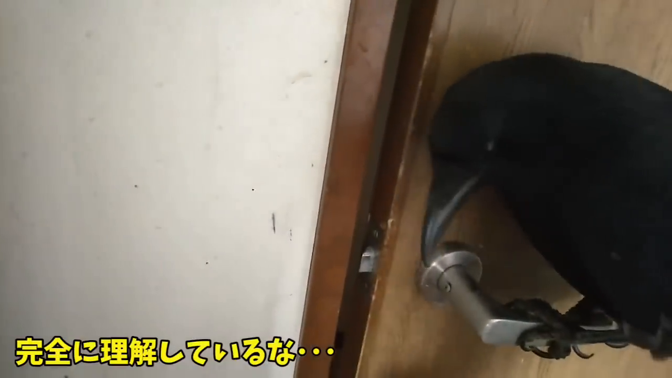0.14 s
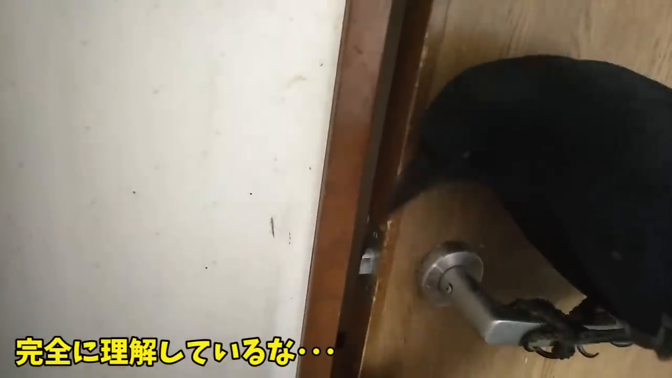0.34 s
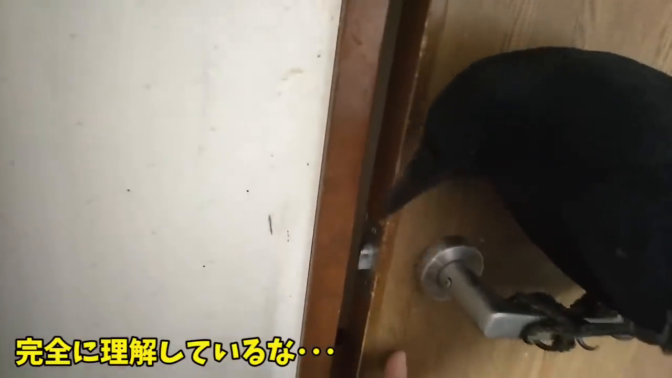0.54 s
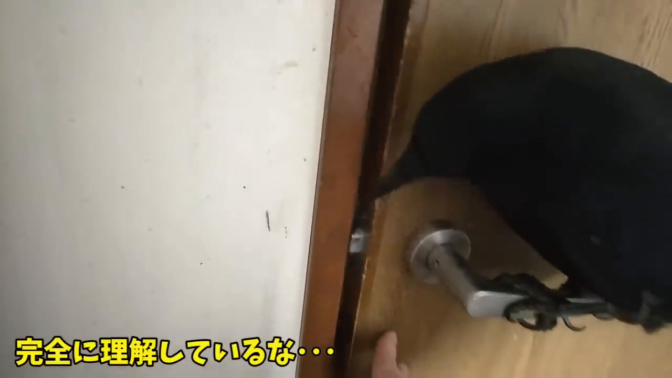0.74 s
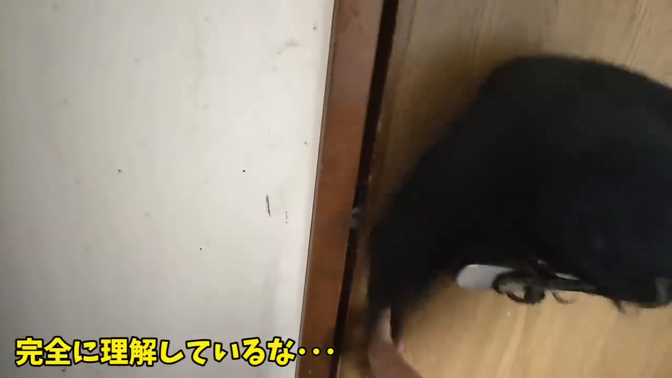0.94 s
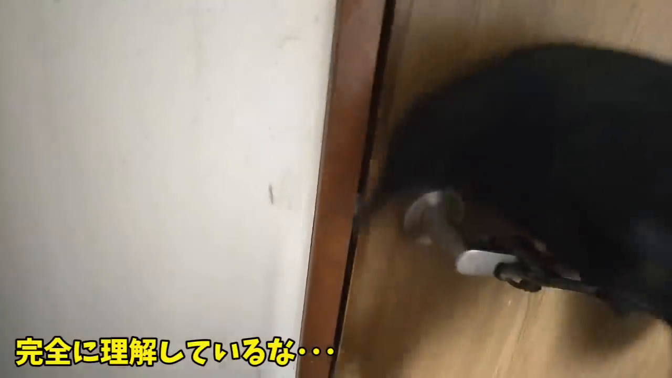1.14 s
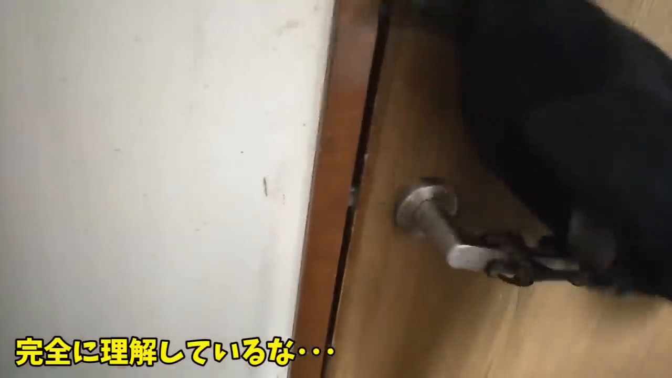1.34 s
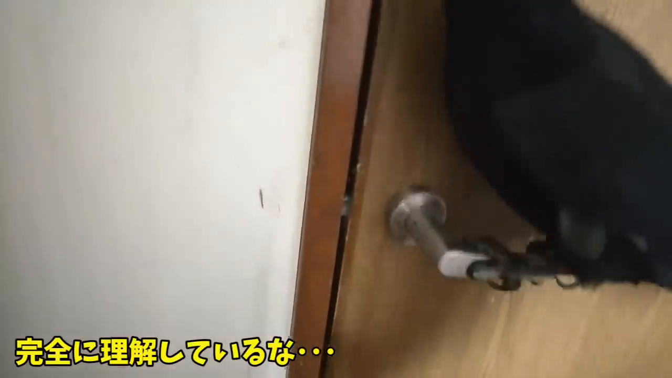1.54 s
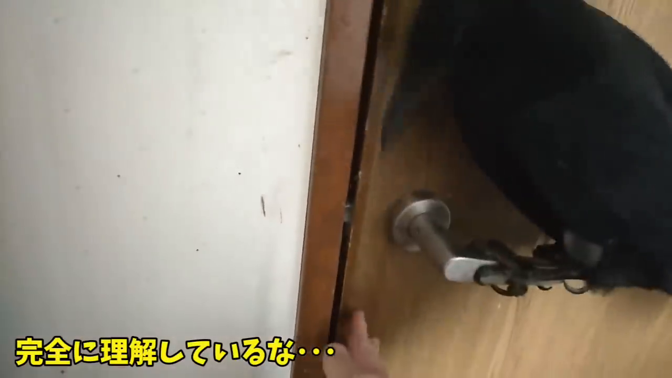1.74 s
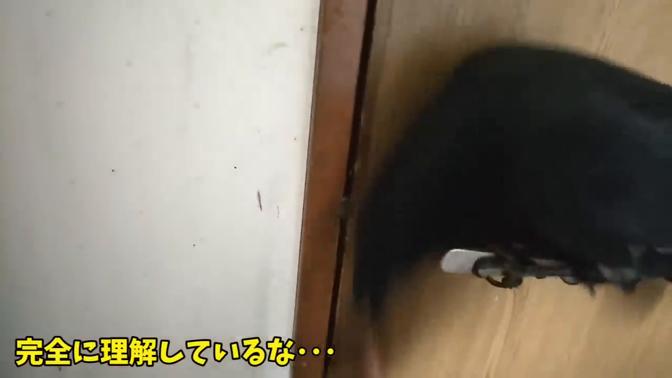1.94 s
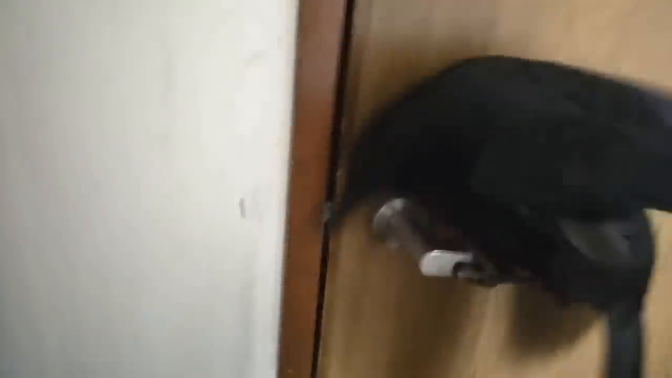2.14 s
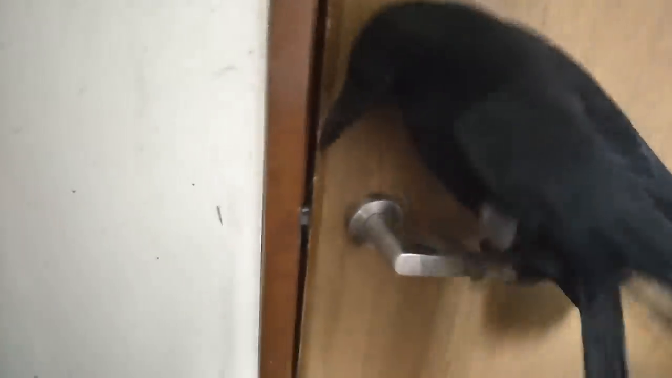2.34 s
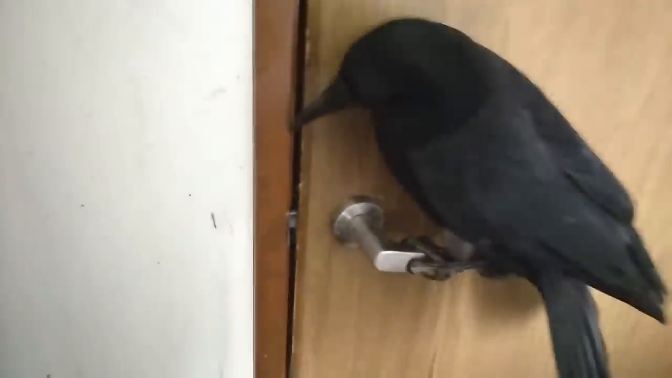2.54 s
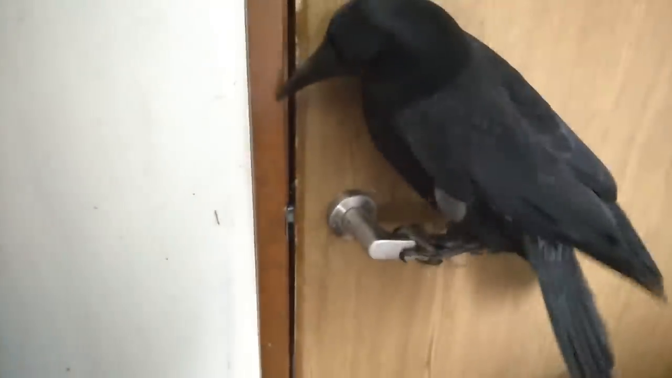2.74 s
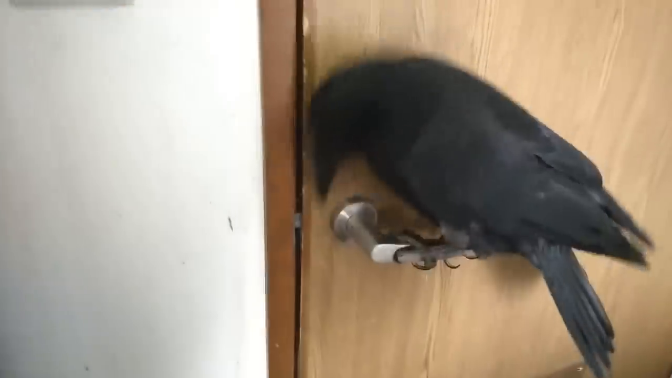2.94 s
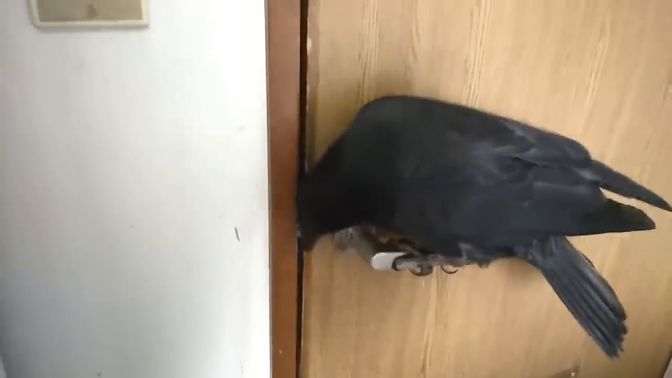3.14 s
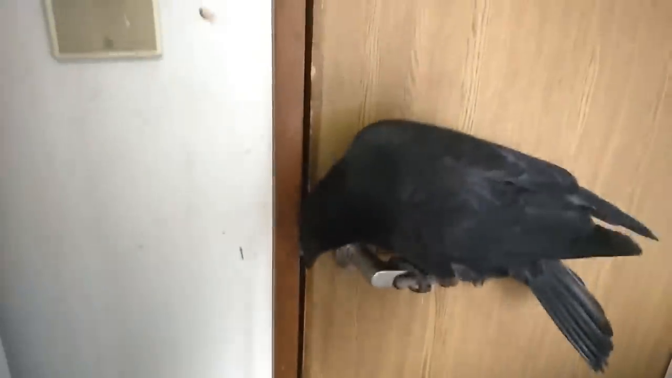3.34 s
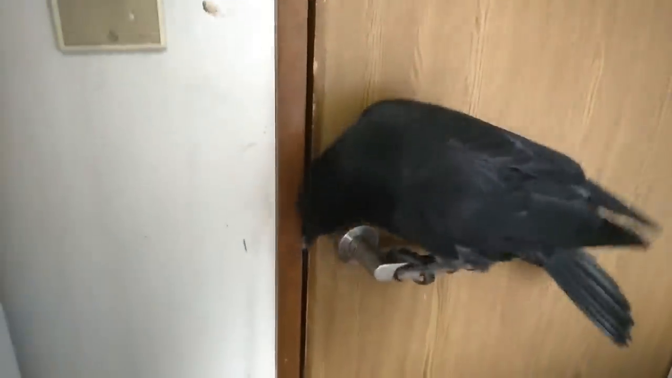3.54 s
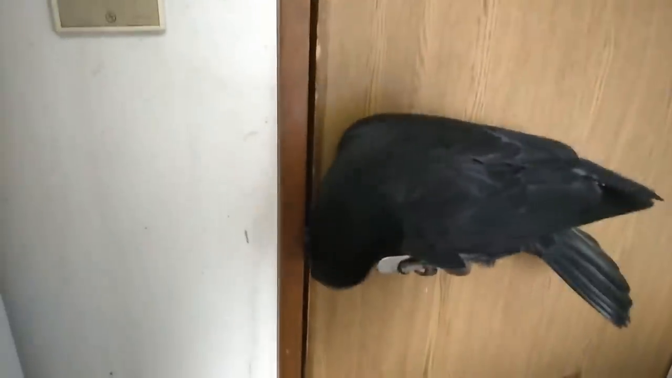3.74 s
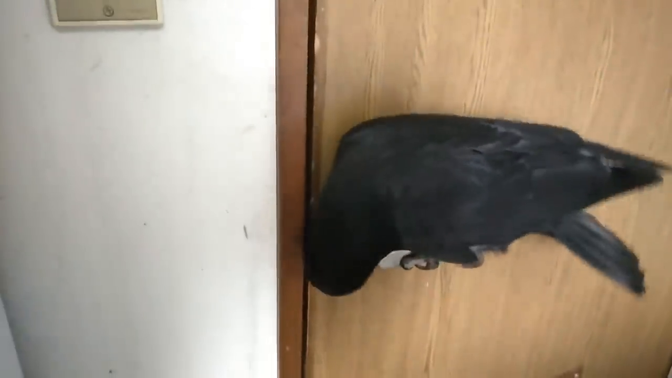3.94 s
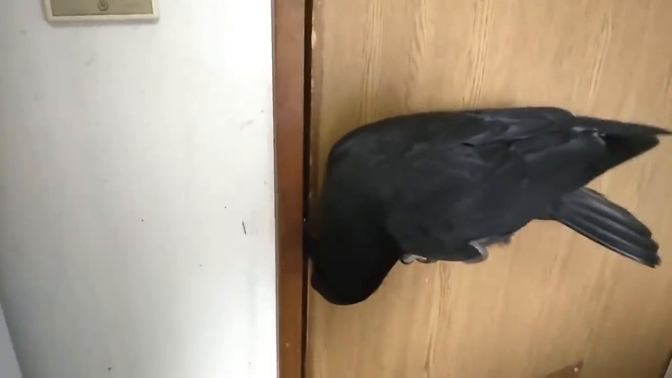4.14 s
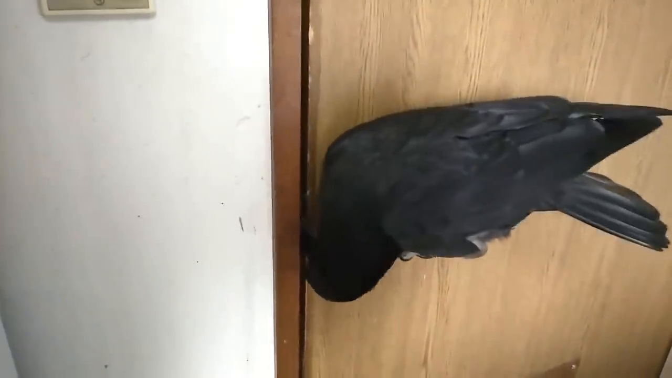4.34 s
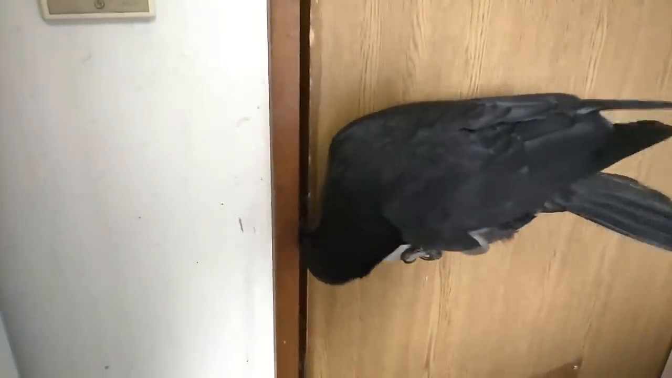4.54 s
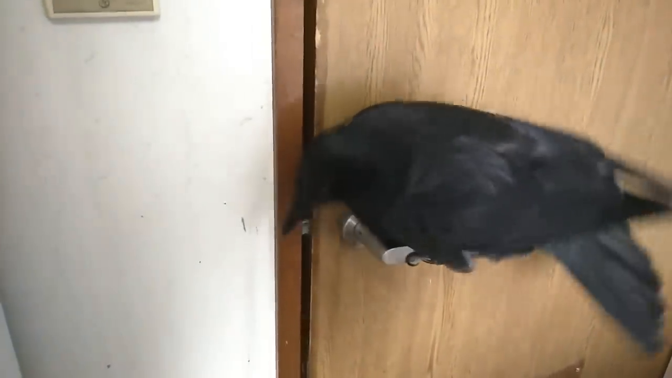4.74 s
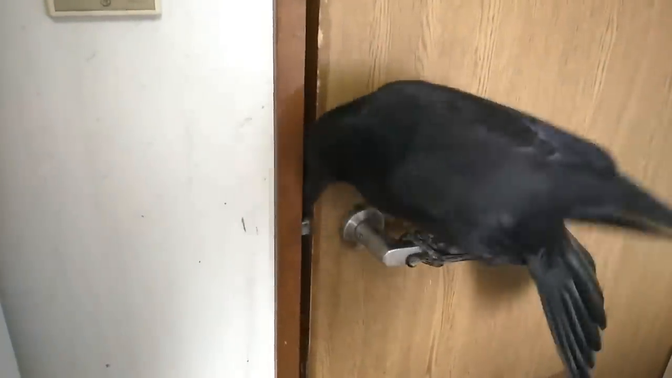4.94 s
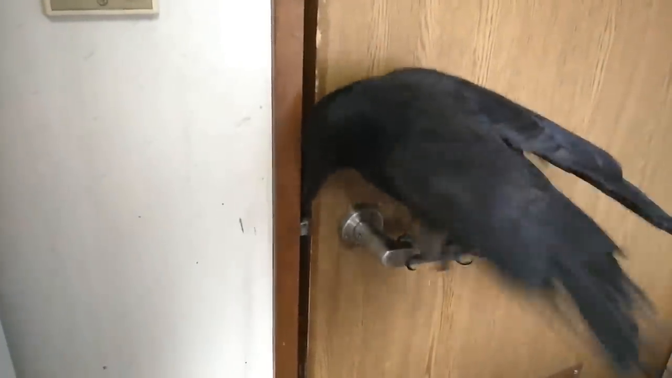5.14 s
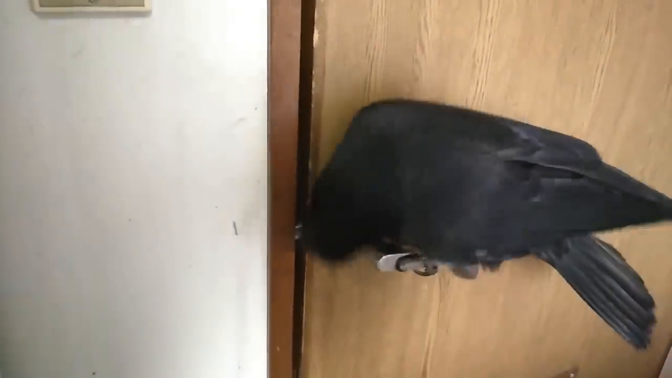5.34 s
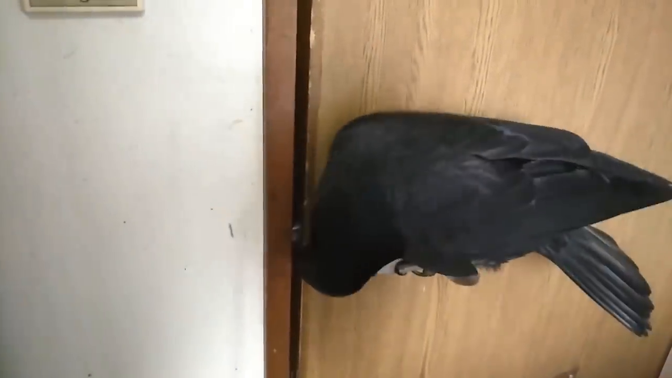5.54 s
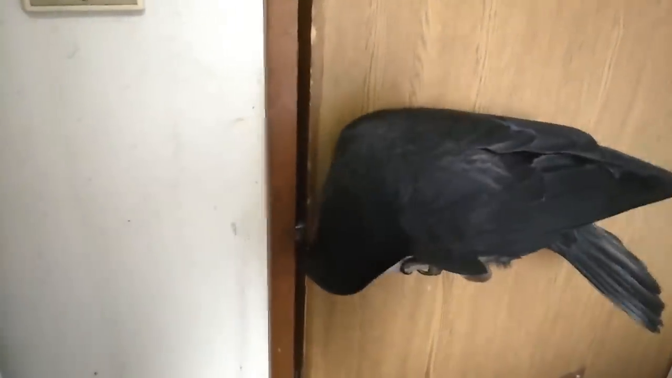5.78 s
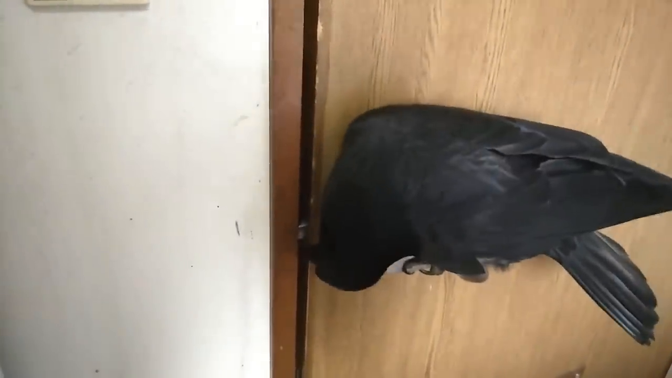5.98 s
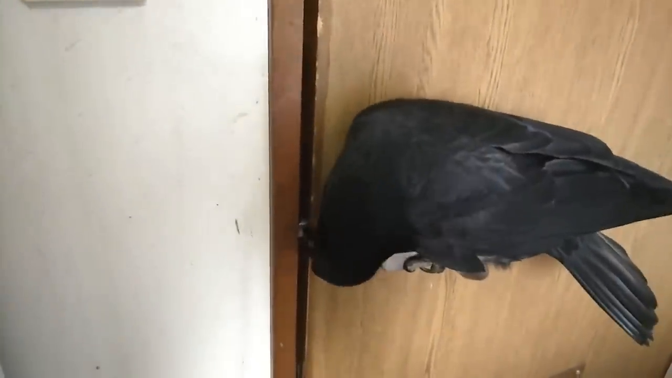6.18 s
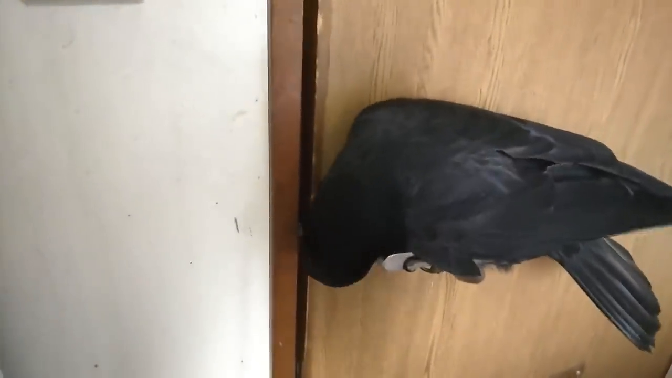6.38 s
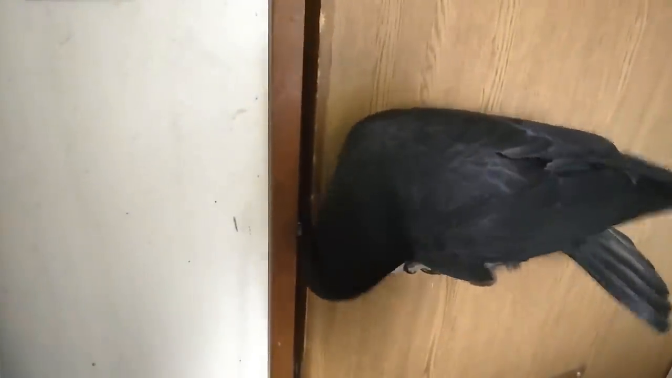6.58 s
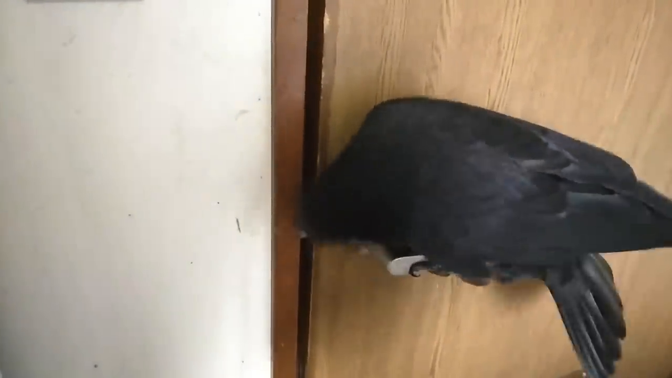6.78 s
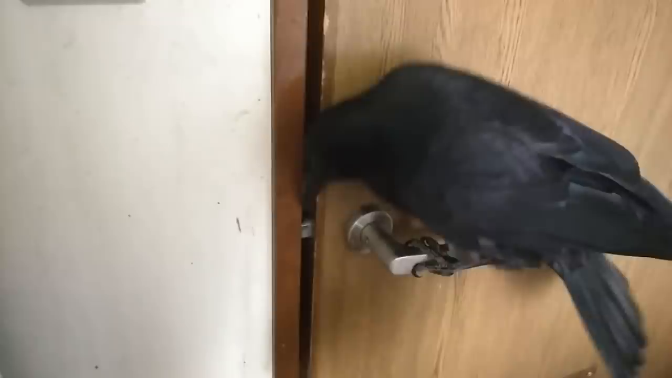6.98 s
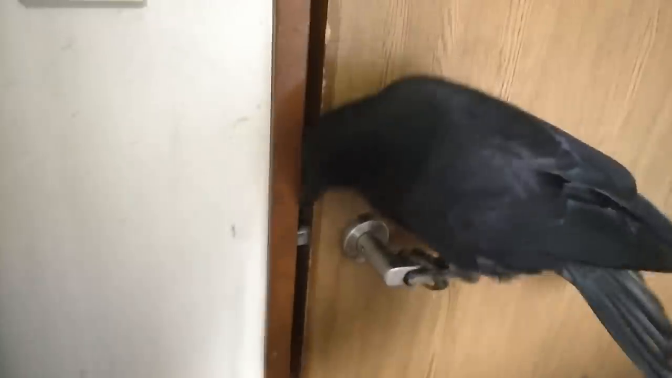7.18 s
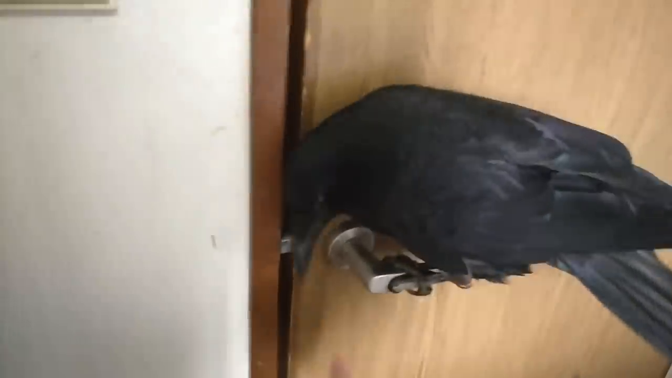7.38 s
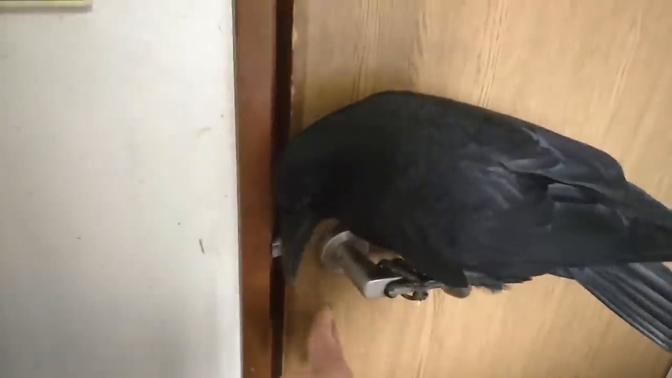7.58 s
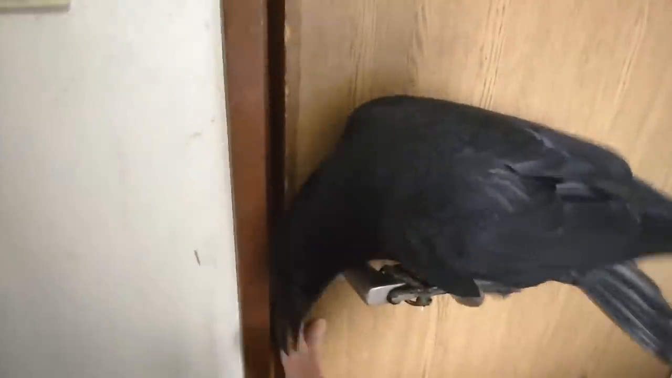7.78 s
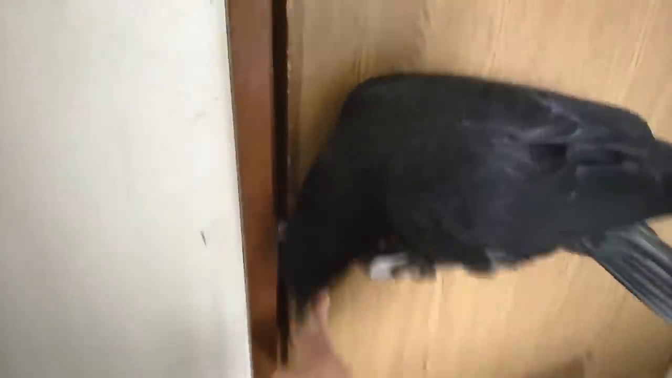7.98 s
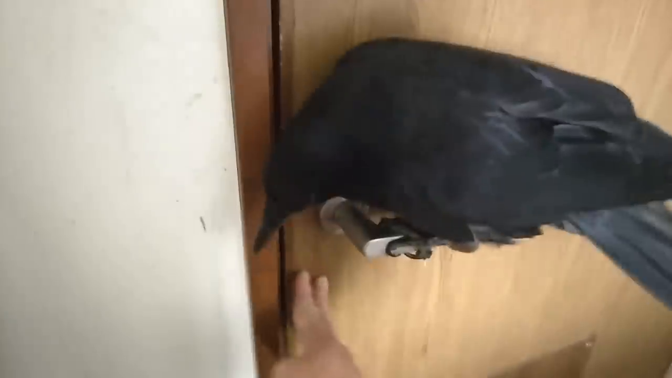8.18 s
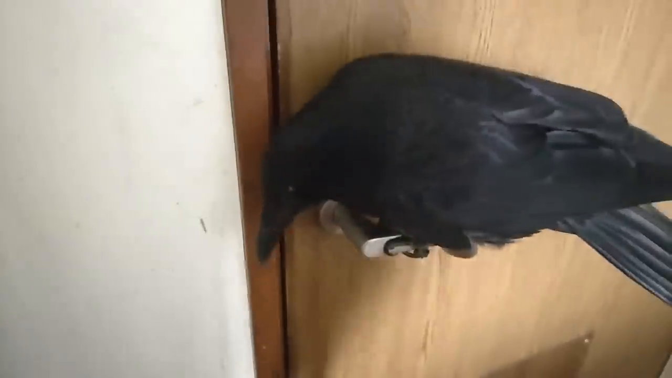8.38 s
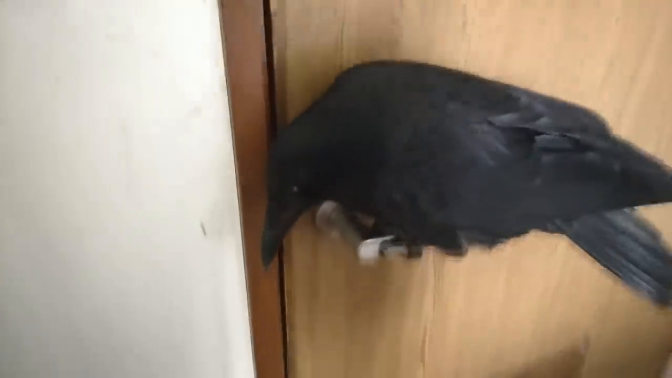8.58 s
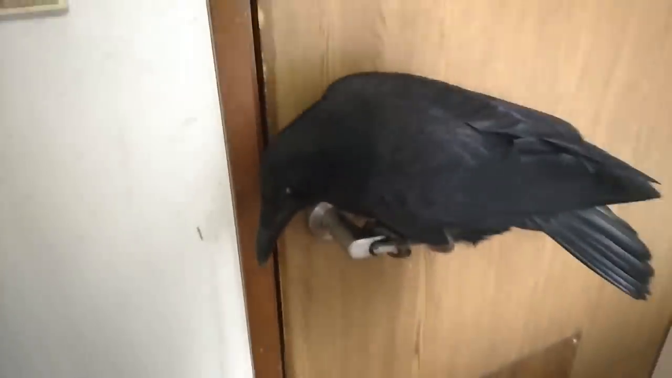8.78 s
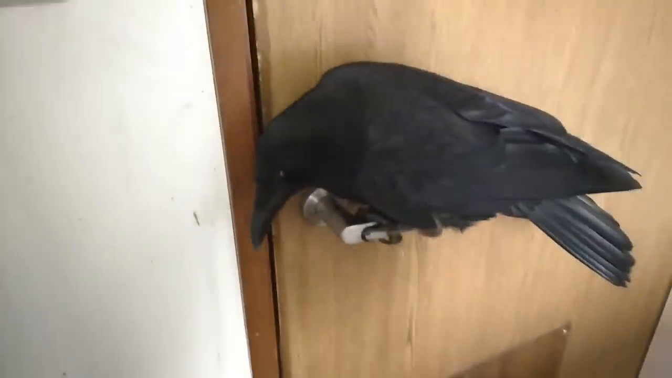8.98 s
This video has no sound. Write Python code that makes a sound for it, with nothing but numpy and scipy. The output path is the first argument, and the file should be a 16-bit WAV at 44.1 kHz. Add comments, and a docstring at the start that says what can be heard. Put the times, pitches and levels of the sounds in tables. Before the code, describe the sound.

Beak and latch strike wood in uneven bursts, dry and bright with a short indoor echo. Soft bassy door shudders accompany the opening knocks; wings brush airily between blows. Sharp clacks stand out around the middle, the heaviest low bang comes late with a quick creak, then it grows nearly quiet but for faint rustle and one tiny tick. Handheld close stereo perspective.

```python
"""Beak and latch knock a wooden door frame: a crow on a steel lever pecks and tugs at a door that stands ajar.
Each knock is a sum of dying wood modes plus a filtered click; ringing sines give the claws on the lever.
Noise jolts through broad resonances shudder the leaf, shoves and one faint dry tick are dying sines, and the
door edge creaks as moving-pitch grains. Shaped grain noise rustles as feathers, over gliding hum tones and steady
noise. A short lively hallway of band-wise dying echoes surrounds the contacts, heard through two microphone ports."""
import sys
import numpy as np
from scipy import signal
from scipy.fft import rfft, irfft, next_fast_len
from scipy.io import wavfile
from scipy.ndimage import uniform_filter1d

SR = 44100
rng = np.random.default_rng(int(sys.argv[2]) if len(sys.argv) > 2 else 0)


def dump_mix(stems):
    """Bounce the given channels to the path in sys.argv[1] as a 16-bit WAV at rate SR."""
    frames = np.atleast_2d(stems).T  # one column per channel
    limited = np.clip(frames, -1, 1)  # hard clip at full scale
    pcm = np.round(limited * 32767).astype(np.int16)
    wavfile.write(sys.argv[1], SR, pcm)


N = 397723

# Broad modes of the door leaf. Each row: pitch in Hz, width in Hz, level in dB, share in the bending (0-1),
# share in the edge flutter (0-1).
LEAF = [(56.5, 10.7, 4.5, 0.45, 0.017), (89.6, 47, 5.5, 0.32, 0), (129.6, 16, -0.5, 0.98, 0.12),
        (158.2, 37, 2.5, 1, 0.25), (211.1, 15.6, -6, 1, 0.5), (290.2, 17.5, -4.5, 0.9, 0.6),
        (355.5, 24.7, -1, 0, 0.93), (491.2, 26, -9.5, 0.0079, 0.99), (608, 62, -12, 0.3, 0.93),
        (857, 67, -10, 0.71, 0.75), (1030, 9.2, -21, 0.19, 0.89)]


def amp(db):
    """Amplitude factor of a level in dB."""
    return 10 ** (np.asarray(db) / 20)


def unit(x):
    """Scales to an RMS of 1."""
    return x / np.sqrt(np.mean(x ** 2))


def at(table, hz):
    """Value of a (Hz, value) table on a log-frequency axis."""
    f, v = np.transpose(table)
    return np.interp(np.log(hz + 1), np.log(f), v)


def shaped(x, gain):
    """Multiplies the spectrum by gain(Hz)."""
    n = next_fast_len(x.shape[-1] + 4096)
    hz = np.arange(n // 2 + 1) * SR / n
    return irfft(rfft(x, n) * gain(hz), n)[..., :x.shape[-1]]


def pair(size):
    """Left and right noise: the bass is partly shared, the treble almost unrelated."""
    # Each row: frequency in Hz, likeness of left and right (0-1).
    likeness = [(60, 0.49), (250, 0.51), (500, 0.138), (1000, 0.034)]
    mid, side = rng.standard_normal((2, size))
    mid = shaped(mid, lambda hz: np.sqrt((1 + np.clip(at(likeness, hz), 0, 1)) / 2))
    side = shaped(side, lambda hz: np.sqrt((1 - np.clip(at(likeness, hz), 0, 1)) / 2))
    return np.array([mid + side, mid - side])


def grains(scatter_db, share):
    """Noise in which a share of the samples carry a contact of random size; RMS 1."""
    touching = rng.standard_normal(N) * (rng.random(N) < share)
    size = amp(scatter_db * rng.exponential(size=N))
    return unit(touching * size)


def ring(modes, gains, t, detune):
    """Dying sines of (Hz, dB, t60 s) modes, slightly off pitch at every strike; peak 1."""
    hz, db, t60 = np.transpose(modes)[:, :, None]
    hz = hz * (1 + detune * rng.standard_normal(hz.shape))
    decay = amp(db - 60 * t / t60)
    y = np.sum(gains * decay * np.sin(2 * np.pi * hz * t), axis=0)
    return y / np.max(np.abs(y))


def swell(start, rise, held, fall_db_s):
    """Envelope of one event: straight rise, hold, steady fall in dB."""
    t = np.arange(N) / SR - start
    fall = amp(-fall_db_s * np.clip(t - rise - max(held, 0), 0, 2))
    return np.clip(t / max(rise, .002), 0, 1) * fall


def room(echo_db):
    """Response of the hallway at both ports: the direct sound, then dense echoes dying band by band."""
    # Decay times in seconds for a 60 dB fall, one per octave band centred from 350 Hz up.
    band_t60_s = [0.25, 0.41, 0.33, 0.41, 0.38, 0.27]
    room_db, port_lag_s = 3.5, .0004
    early_db, early_s = 5.5, 0.012  # boost of the first echoes and how fast that boost fades
    t = np.arange(SR * 2 // 5) / SR
    echoes, tail = pair(len(t)), 0
    for k, t60 in enumerate(band_t60_s):
        hz = 350 * 2 ** k
        band = shaped(echoes, lambda f: np.cos(np.pi / 2 * np.clip(np.log2((f + 1) / hz), -1, 1)) ** 2)
        tail = tail + band * amp(-60 * t / t60)
    # near walls give strong first echoes, which build up over the first milliseconds
    build_up = np.clip((t - .001) / 0.0016, 0, 1)
    tail = tail * amp(early_db * np.exp(-t / early_s)) * build_up
    # echo energy relative to the direct sound
    tail = amp(room_db + echo_db) * tail / np.sqrt(np.sum(tail ** 2) / 2)
    tail[0, 0] += 1
    tail[1, int(port_lag_s * SR)] += 1  # the left port is nearer to the latch
    return tail


def quiet():
    """Steady background noise, heaviest in the bass."""
    # Each row: frequency in Hz, relative spectral level in dB.
    quiet_tone = [(30, 5), (180, 0), (240, -2), (330, -5.5), (770, -11), (2800, -18), (6300, -19),
                  (14000, -19)]
    quiet_db = -56
    return amp(quiet_db) * unit(shaped(pair(N), lambda hz: amp(at(quiet_tone, hz))))


def hum():
    """Faint tones that come and go, each sagging a little in pitch."""
    # Each row: start in seconds, hold in seconds, starting pitch in Hz, level in dB.
    tones = [(0.116, 0.089, 235, -66.5), (0.361, 0.11, 248, -57.5), (0.653, 0.019, 246, -60),
             (3.781, .15, 252, -61)]
    rise_s, fall_db_s, sag_hz_s = 0.019, 196, 40.3
    out = 0
    for s, held, hz, db in tones:
        t = np.arange(N) / SR - s
        tone = np.sqrt(2) * np.sin(2 * np.pi * (hz - sag_hz_s * t / 2) * t)
        out = out + amp(db) * swell(s, rise_s, held, fall_db_s) * tone
    return out


def rustle():
    """Feathers and claws brushing: dense tiny barb contacts give a bright hiss and a duller scrape."""
    # Each row: start in seconds, rise in seconds, hold in seconds, hiss level in dB,
    # level of the scrape relative to the hiss in dB.
    brushes = [(.63, .03, 0.065, -67.5, -0.5), (1.03, 0.15, 0.069, -51, -5),
               (1.328, 0.023, .01, -38.5, -17), (1.4, 0.049, 0.043, -54.5, -11),
               (1.62, 0.068, 0.081, -64, -9.5), (1.93, 0.08, 0.18, -52, -14.5),
               (2.2, 0.04, 0.097, -64, -20), (2.324, 0.017, 0.0078, -42, -24), (2.4, 0.043, 0.12, -63, -11),
               (2.79, 0.039, 0.082, -58, -11), (3.05, 0.085, 0.064, -54, -12),
               (3.45, 0.071, 0.14, -51.5, -19), (3.75, 0.023, 0.068, -58.5, -23),
               (4.38, 0.044, 0.037, -76, 7), (4.5, 0.26, 0.022, -64, 4.5), (5.0, 0.12, .02, -56, -12),
               (5.174, 0.018, 0.0092, -42, -19), (5.35, 0.12, 0.066, -55.5, -30),
               (6.03, 0.02, 0.032, -66.5, -20), (6.15, 0.023, 0.03, -72, -27),
               (6.98, 0.19, 0.027, -51.5, -11.5), (7.33, 0.081, 0.56, -66, -3), (7.799, 0.01, .2, -61, -10),
               (8.43, .03, 0.092, -63.5, -15.5), (8.61, 0.029, 0.022, -58, -12), (8.8, .03, .2, -92, -9.5)]
    # Colour of the hiss and of the scrape. Each row: frequency in Hz, level in dB.
    hiss_tone = [(1500, -8), (3500, -6), (5000, -3.5), (8500, 3), (14000, 4)]
    scrape_tone = [(400, 6.5), (1000, 0), (2500, -0.5), (4500, -7.5)]
    fall_db_s, flicker_db, flicker_s = 190, 3.5, .012
    shape = np.array([swell(s, rise, held, fall_db_s) for s, rise, held, *_ in brushes])
    level_db, scrape_db = np.array(brushes)[:, 3:].T
    hiss = unit(shaped(grains(1.5, .5), lambda hz: amp(at(hiss_tone, hz))))
    scrape = unit(shaped(grains(1.5, .5), lambda hz: amp(at(scrape_tone, hz))))
    # barbs catch and let go unevenly
    hold = max(int(flicker_s * SR), 200)
    steps = np.repeat(rng.standard_normal(N // 200), hold)[:N]
    flicker = amp(flicker_db * uniform_filter1d(steps, hold // 2))
    brushing = amp(level_db) @ shape * hiss + amp(level_db + scrape_db) @ shape * scrape
    close = flicker * brushing
    return signal.fftconvolve(close[None], room(0)[:, :SR // 12], axes=1)[:, :N]


def door():
    """Uneven soft jolts drive the broad modes of the leaf; overlapping shakes add in power."""
    # Shakes as the bird shifts its weight. Each row: start in seconds, hold in seconds, swing on the hinges
    # in dB, bending above that in dB, edge flutter above the swing in dB.
    shakes = [(.66, .05, -69, 7, 7.5), (.93, .12, -37, -4.5, -0.5), (1.145, 0.039, -33.5, -4, -21),
              (1.198, 0.036, -37.5, 1, 5), (1.33, 0.22, -58.5, 5, -27), (1.585, 0.073, -54, 6.5, -6),
              (1.91, 0.039, -43.5, -7, -5), (1.958, 0.046, -41, -2, 5.5), (2.1, 0.17, -54.5, 1.5, -6),
              (2.49, 0.093, -54, 3.5, -8), (2.845, 0.16, -58.5, 5.5, -1.5), (3.6, 0.083, -53, 1.5, -3.5),
              (3.98, 0.23, -48, -0.5, -4.5), (4.139, 0.024, -58, 15, 17), (4.2, 0.14, -58, -5, -27),
              (4.399, 0.039, -65.5, 7.5, 6), (4.62, 0.15, -57, -1, -14), (4.77, 0.091, -64, 11, 27.5),
              (5.078, 0.026, -65, 11.5, 12), (5.17, 0.035, -54, 6.5, 11), (5.33, 0.067, -51, -2.5, -3.5),
              (5.73, 0.023, -57.5, 7, 5), (6.025, 0.014, -62, -5, 0), (6.36, 0.066, -62.5, 6, 1),
              (6.601, 0.14, -62, 12, 6), (6.74, 0.063, -50.5, 5, 11), (7.2, .15, -64.5, 9.5, 10.5),
              (7.47, 0.023, -59.5, 5, 4.5), (7.9, 0.15, -54, -7, -14), (8.025, 0.018, -54, -1, -18),
              (8.051, 0.12, -36.5, 0.5, -16), (8.13, .07, -36.5, 2, 3), (8.209, 0.016, -19, -5.5, -12.5),
              (8.302, 0.073, -41, 4, 14.5), (8.5, 0.036, -37.5, -13, -32), (8.65, 0.11, -55, 1, -36),
              (8.774, 0.0064, -70, 10, 11), (8.869, .15, -62, -6, -35)]
    # The leaf never quite rests: swing, bending and flutter in dB, as above.
    tremor = -77, 6.5, 1.5
    rise_s, fall_db_s = 0.0094, 140.5
    power = [swell(s, rise_s, held, fall_db_s) ** 2 for s, held, *_ in shakes]
    power = np.array(power + [np.ones(N)])
    swing_db, bend_db, flutter_db = np.transpose([row[2:] for row in shakes] + [tremor])
    shares = np.array(LEAF)[:, 3:]
    mode_db = swing_db + shares @ [bend_db, flutter_db]
    drive = np.sqrt(amp(mode_db) ** 2 @ power)
    jolts, out = grains(2.5, .05), 0
    for (hz, width, db, *_), gain in zip(LEAF, drive):
        b, a = signal.iirpeak(hz, hz / width, SR)
        soft, wide = signal.iirpeak(hz, .9, SR)  # a cushioned push has no sharp edge
        mode = unit(signal.lfilter(b, a, signal.lfilter(soft, wide, jolts)))
        out = out + amp(db) * gain * mode
    return out


def shoves_and_tick():
    """Shoves of the leaf against its stop, and one faint dry tick close by at 8.78 s, sound the modes near
    their pitch after a softened rise."""
    # Each row: start in seconds, peak in dB before the rise softens it, favoured pitch in Hz,
    # time constant of the rise in milliseconds. The last row is the tick.
    strikes = [(0.938, -25, 170, 2.2), (0.973, -19, 55, 5.1), (1.148, -18.5, 59, 4), (1.201, -19, 374, 2.6),
               (1.599, -37, 218, 5), (1.933, -22, 60, 5), (1.967, -17, 390, 3.1), (2.847, -27, 170, 3.3),
               (3.64, -48, 60.4, 5), (3.984, -24, 148, 2.6), (8.054, -19, 118, 4.1),
               (8.135, -12.5, 393, 4.9), (8.212, 1.5, 63, 9.6), (8.317, -5.5, 366, 3.7),
               (8.78, -43, 500, .6)]
    out, t = np.zeros(N + SR), np.arange(SR // 4) / SR
    # a wider resonance dies sooner
    modes = [(hz, 0, np.log(1000) / np.pi / width) for hz, width, *_ in LEAF]
    for s, db, hz, ms in strikes:
        near = amp(-20 * np.abs(np.log2(np.array(modes)[:, :1] / hz)))  # 20 dB less per octave away
        rise = (1 - np.exp(-t / ms * 1000)) ** 2
        out[int(s * SR):int(s * SR) + len(t)] += amp(db) * ring(modes, near, t, 0.025) * rise
    return out[:N]


def leaf_and_tick_at_ports():
    """Leaf and tick reach both ports almost alike; a tiny offset separates mainly the upper modes."""
    near_sound = door() + shoves_and_tick()
    return np.array([near_sound, np.roll(near_sound, -int(0.00027 * SR))])  # right port earlier


def creak():
    """The door edge rubs on the frame: slipping grains carried on a gliding tone of the wood."""
    # Each row: start in seconds, rise in seconds, hold in seconds, starting pitch in Hz, glide in Hz per second,
    # level in dB before the tone and the room.
    rubs = [(.97, .01, .17, 670, 1400, -45), (1.21, .01, .02, 687, 267, -56),
            (1.98, 0.011, .03, 768, -260, -51), (5.76, 0.017, .01, 1086, -580, -46),
            (8.12, 0.057, .005, 760, 2203, -35), (8.34, .01, .1, 824, -800, -71.5)]
    fall_db_s = 167
    out = 0
    slips = unit(shaped(grains(2.74, 0.071), lambda hz: 1 / (1 + (hz / 110) ** 2)))
    for s, rise, held, hz, glide, db in rubs:
        t = np.arange(N) / SR - s
        tone = np.sin(2 * np.pi * (hz + glide * t / 2) * t)
        out = out + amp(db) * swell(s, rise, held, fall_db_s) * slips * tone
    return signal.fftconvolve(out[None], room(-9.5)[:, :SR // 12], axes=1)[:, :N]


def lever():
    """Claws tick on the steel, which rings thinly and close by, so the walls add little."""
    # Each row: start in seconds, peak in dB before the room.
    ticks = [(1.5711, -36), (2.9887, -37.5), (7.2417, -23)]
    # Modes of the steel lever. Each row: pitch in Hz, level in dB, 60 dB decay time in seconds.
    steel = [(3740, -18, .08), (6110, -20, .1), (6455, -10, .12), (7550, 0, .16), (7630, -14, .2),
             (9700, -14, .06), (10220, -12, .08), (12800, -4, .04)]
    out, t = np.zeros(N), np.arange(SR // 4) / SR
    for s, db in ticks:
        out[int(s * SR):int(s * SR) + len(t)] += amp(db) * ring(steel, 1, t, .002)
    return signal.fftconvolve(out[None], room(-6), axes=1)[:, :N]


def blows():
    """Each contact of beak, claw or latch rings the wood and cracks; rebounds and echoes repeat it."""
    # Each row: start in seconds, wood peak in dB before the bass cut, crack peak in dB, favoured wood pitch in Hz,
    # narrowness in dB per octave (below zero acts as zero), crack centre in Hz, left minus right in dB.
    # Both peaks are before the room.
    contacts = [(0.927, -21.5, -13, 2400, 11, 7700, -2), (0.938, -19.5, -15, 870, 13, 6300, -2),
                (1.146, -25.5, -30, 883, -6, 3600, -2.5), (1.199, -27.5, -40, 557, 10, 8120, -9),
                (1.575, -47, -16, 2470, 0, 9780, 4.5), (1.927, -34, -36.5, 2120, 27, 4060, 1),
                (1.963, -29, -39, 560, 9, 4850, -2), (2.5, -55, -30.5, 678, 10, 6600, 6),
                (2.549, -22.5, -7.5, 1340, 46, 6660, -0.5), (2.819, -54, -37.5, 598, 25, 6420, 9),
                (2.988, -52, -15.5, 940, 17, 8300, 2), (3.616, -39.5, -23, 556, 19, 11100, 6),
                (3.985, -37, -31, 552, -4, 4020, 0), (4.002, -34, -26, 785, 1, 5900, 4.5),
                (4.042, -20, -13, 1036, 32, 3690, 2), (4.093, -29, -11.5, 800, -7, 8000, -1.5),
                (4.139, -9, -7, 1000, -3.5, 4900, -0.5), (4.145, -17.5, -5.5, 1030, 10, 4700, 0),
                (4.704, -41, -38, 1000, 18, 4290, 10), (4.725, -27.5, -37.5, 1000, 8, 3570, -2),
                (4.769, 0, 1.5, 2280, 5, 5240, -0.5), (4.777, -7, -29, 1030, 15, 8330, 0),
                (5.179, -35, -21, 635, 7, 7970, 5), (5.323, -41.5, -22, 606, 3, 11100, 4),
                (5.733, -27.5, -29.5, 1180, 9, 4870, 1), (6.358, -26, -29.5, 651, 0.5, 3510, 0.5),
                (6.51, -36.5, -55, 950, -2, 3670, -1), (6.606, -23, -22, 1030, 21, 4310, 1),
                (6.679, -20, -23, 1070, 1, 3670, -1), (6.733, -18.5, -12.5, 1700, 1, 6770, -7),
                (6.746, -4.5, 6, 1900, 5.5, 8200, -4.5), (6.753, -10, -14, 653, 9, 7140, 7.5),
                (7.244, -45, -17, 649, 11, 7900, 4), (7.483, -46, -31.5, 960, 5, 8420, 6.5),
                (7.831, -44.5, -42, 1720, 27, 3500, 3), (8.095, -39.5, -58, 950, 2, 3500, -2),
                (8.17, -33, -58, 1000, 7, 3510, 11), (8.21, -15, -17, 2650, 28, 3750, 4),
                (8.219, -10, 6.5, 980, -5, 7760, -3), (8.321, -15.5, -40, 1650, 18, 3500, -0.5),
                (8.781, -43.5, -40.5, 1610, 8, 5000, -7)]
    # Modes of frame and door edge. Each row: pitch in Hz, level in dB, 60 dB decay time in seconds.
    wood = [(545, -3, .025), (668, 0, .04), (800, -2, .025), (1030, 0, .04), (1250, 0, .028),
            (1450, -2, .02), (1650, 0, .016), (1950, 0, .011), (2360, 1, .01), (2880, 1, .01),
            (3300, 0, .01)]
    rebound_db, chatter_s, echo_db = -45.5, 0.0013, 1.5
    out, t = np.zeros((2, N + SR)), np.arange(SR // 8) / SR
    small = signal.butter(3, 420, "high", fs=SR, output="sos")  # a small contact radiates no bass
    click = np.diff(t == 0, prepend=0)
    for s, wood_db, crack_db, wood_hz, narrow_db, crack_hz, pan_db in contacts:
        # the place struck favours the modes near one pitch
        octaves = np.abs(np.log2(np.array(wood)[:, :1] / wood_hz))
        near = amp(-max(narrow_db, 0) * octaves)
        knock = signal.sosfilt(small, ring(wood, near, t, 0.041))
        band = signal.iirpeak(crack_hz, .7, SR)
        crack = signal.lfilter(*band, signal.lfilter(*band, click))
        crack = crack / np.max(np.abs(crack))
        contact = amp(wood_db) * knock + amp(crack_db) * crack
        # every blow has its own pattern of echoes and rebounds
        path = room(echo_db)
        path[:, :len(t)] += amp(rebound_db) * rng.standard_normal(len(t)) * np.exp(-t / chatter_s)
        wet = signal.fftconvolve(contact[None], path, axes=1)
        out[:, int(s * SR):int(s * SR) + wet.shape[1]] += wet * amp([[pan_db / 2], [-pan_db / 2]])
    return out[:, :N]


def scene():
    """All layers summed at the left and right ports."""
    leaf_and_tick = leaf_and_tick_at_ports()
    background = quiet()
    return blows() + lever() + creak() + rustle() + leaf_and_tick + hum() + background


def record(dry):
    """Microphone colour, unequal ports, a soft ceiling on the loudest knocks and the cut at the top."""
    # Colour common to both ports. Each row: frequency in Hz, level in dB.
    mic_tone = [(25, -32), (50, -1.5), (2900, 7), (3450, 5.5), (4100, 7), (6000, 4.5), (8800, 5.5),
                (10000, -5), (11000, -4), (13800, -7.5), (14600, -39.5), (16000, -45)]
    # Imbalance of the ports. Each row: frequency in Hz, left minus right in dB.
    port_tilt = [(200, 0), (380, 1.5), (700, 1.5), (1300, -1), (2400, 0), (8000, -1.5), (10000, 6.5),
                 (12500, 6)]
    ceiling, top_hz = .88, 15570
    x = shaped(dry, lambda hz: amp(at(mic_tone, hz) + np.outer([.5, -.5], at(port_tilt, hz))))
    x = x / (1 + np.abs(x / ceiling) ** 4) ** .25
    return signal.sosfilt(signal.ellip(8, .2, 70, top_hz, fs=SR, output="sos"), x)


dry = scene()
out = record(dry)
dump_mix(out)
```